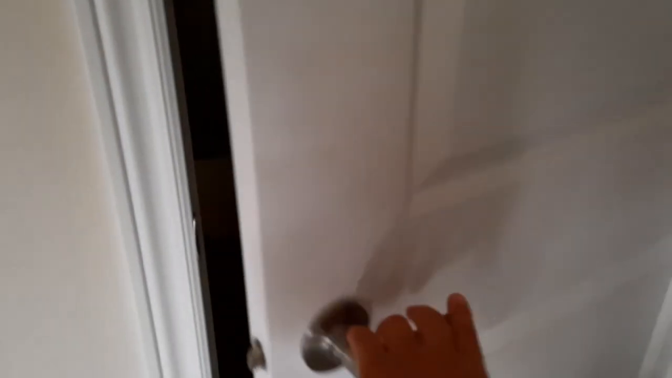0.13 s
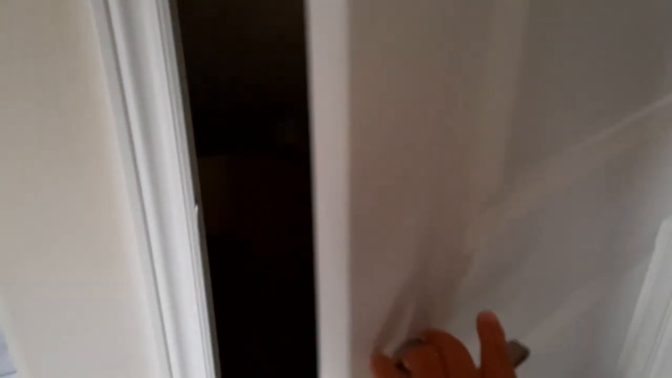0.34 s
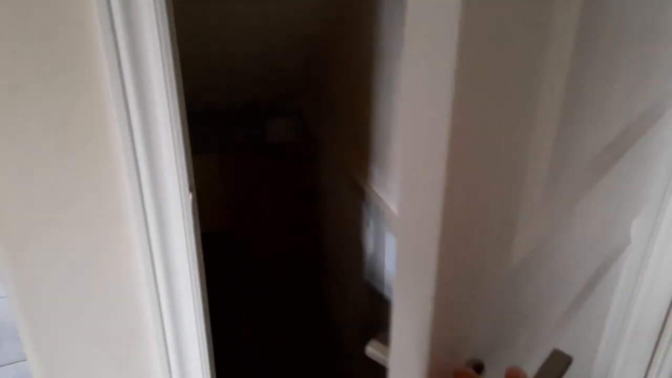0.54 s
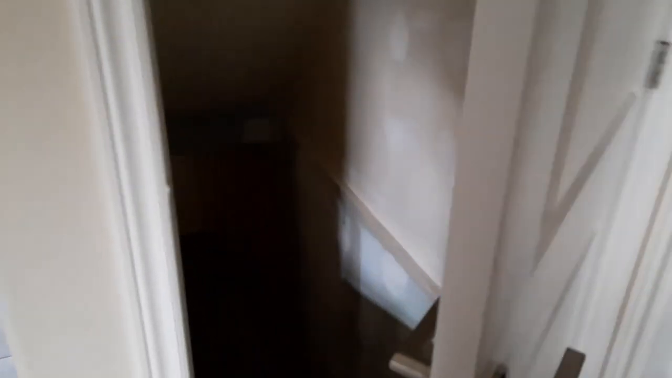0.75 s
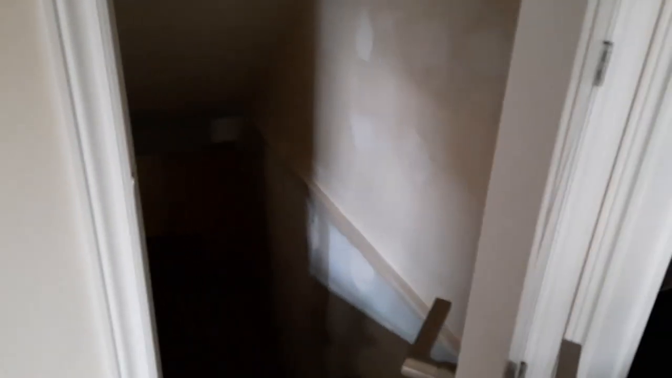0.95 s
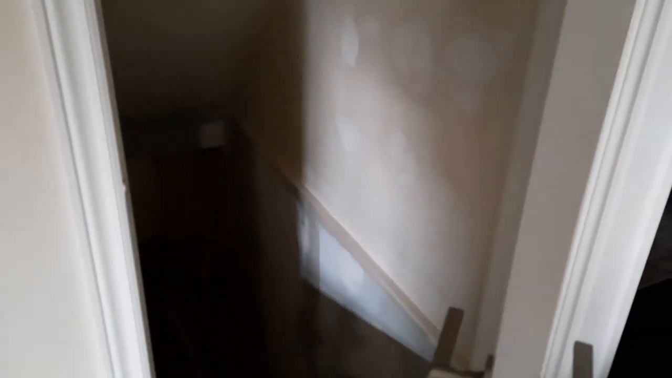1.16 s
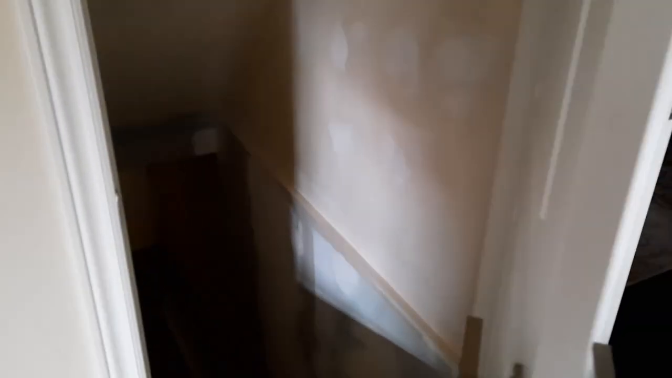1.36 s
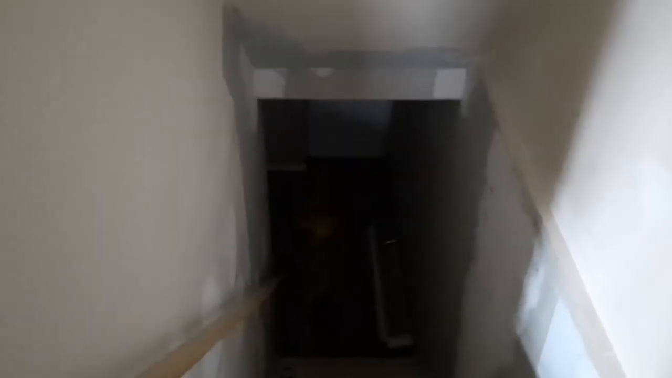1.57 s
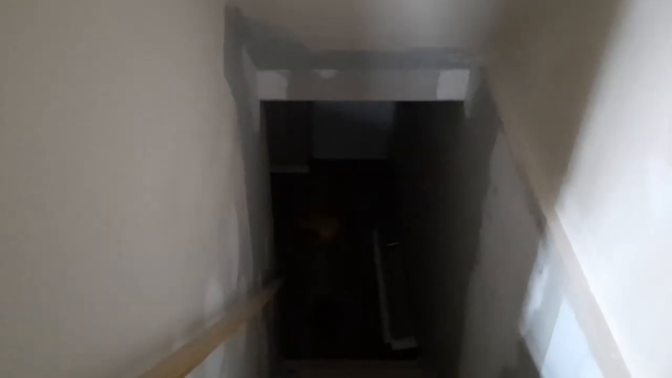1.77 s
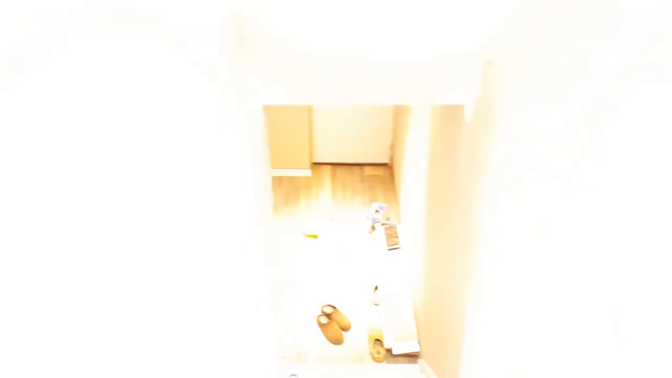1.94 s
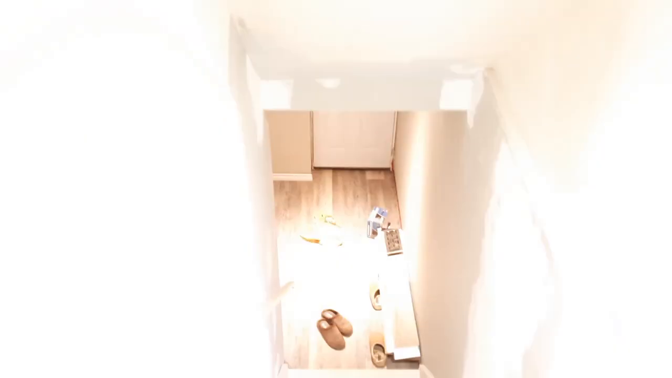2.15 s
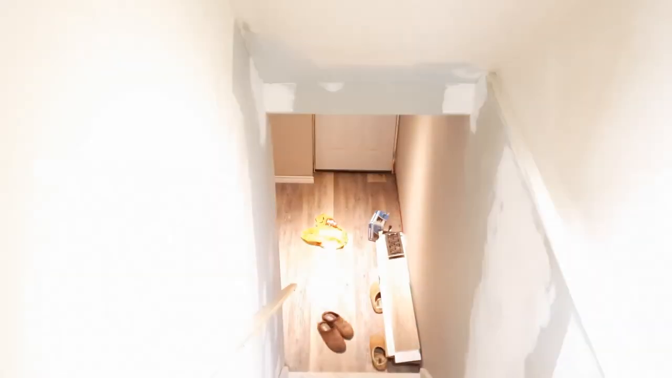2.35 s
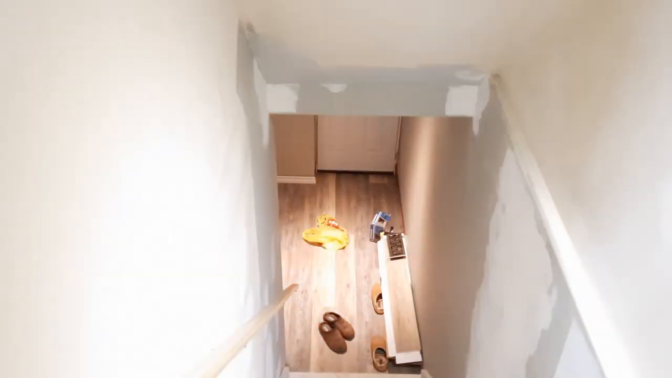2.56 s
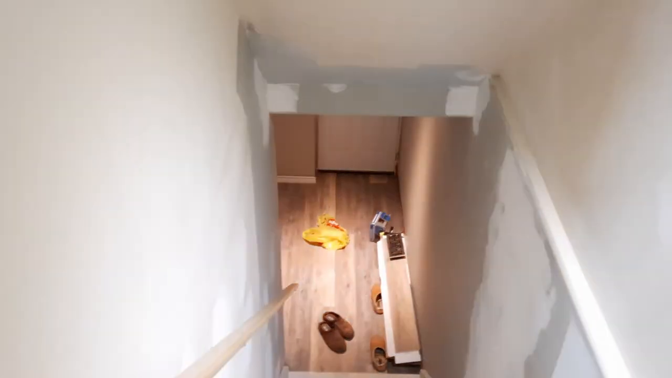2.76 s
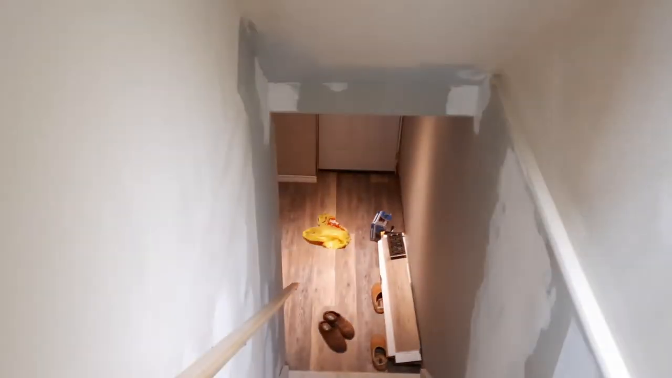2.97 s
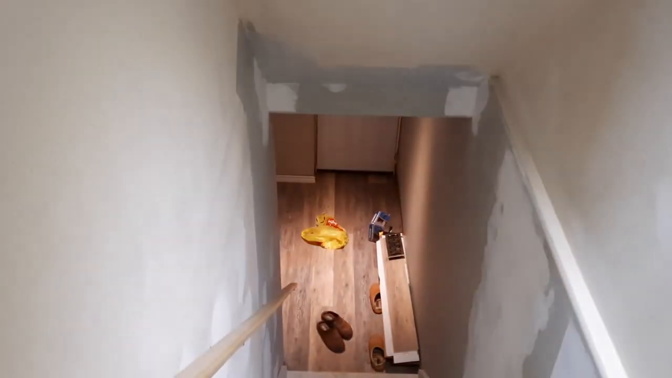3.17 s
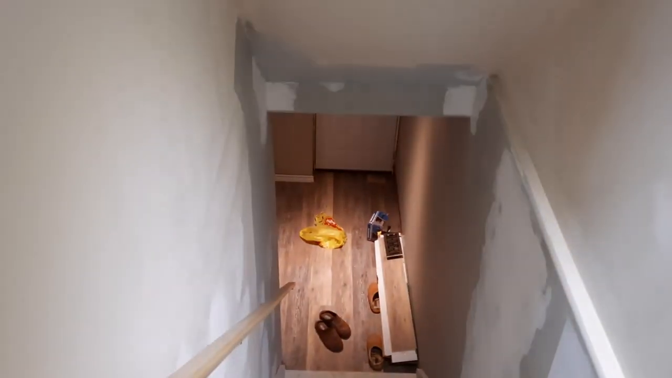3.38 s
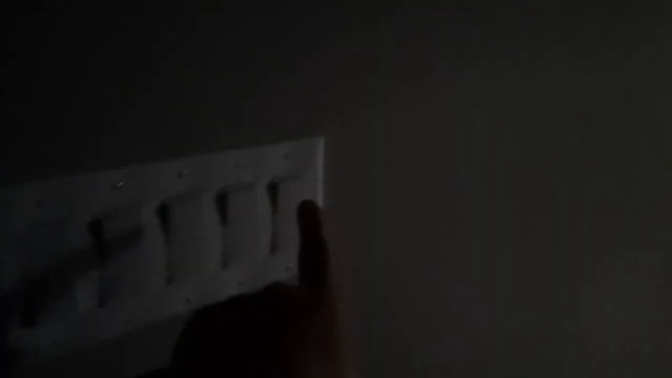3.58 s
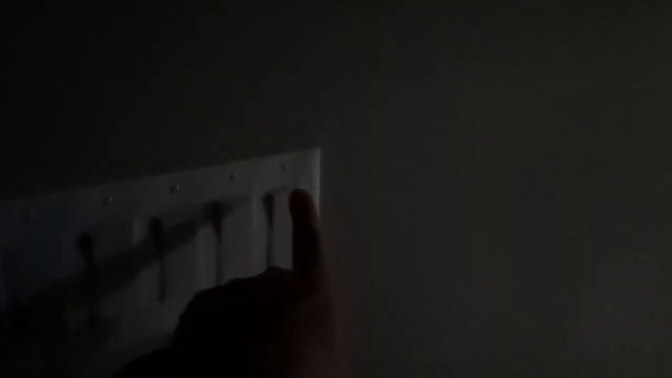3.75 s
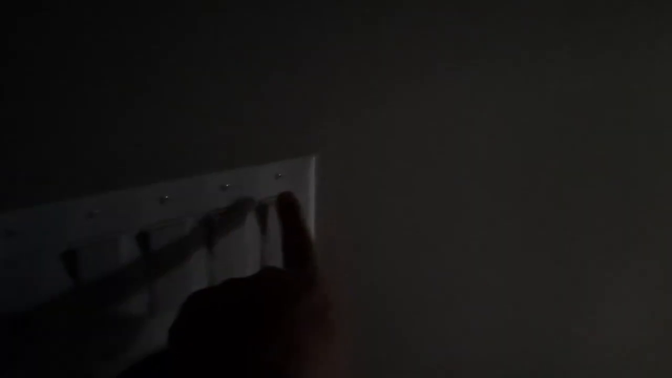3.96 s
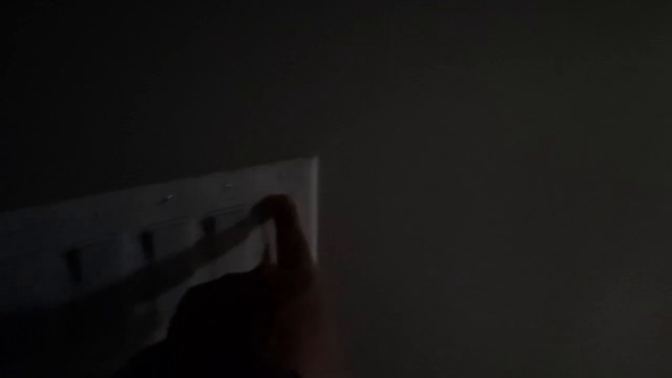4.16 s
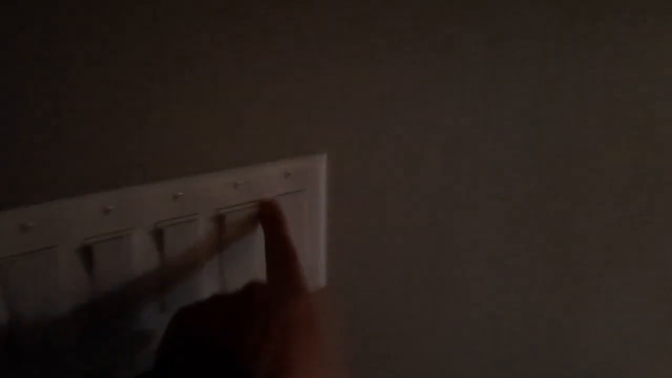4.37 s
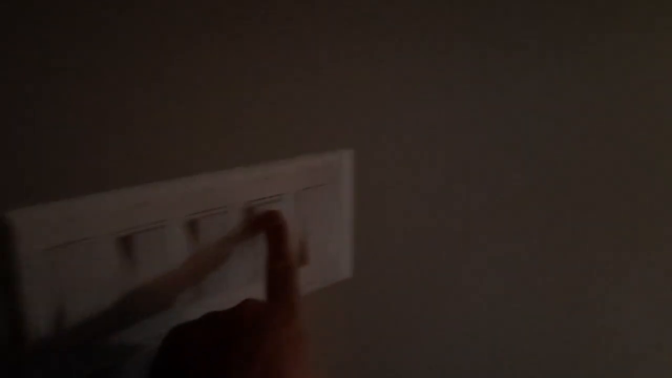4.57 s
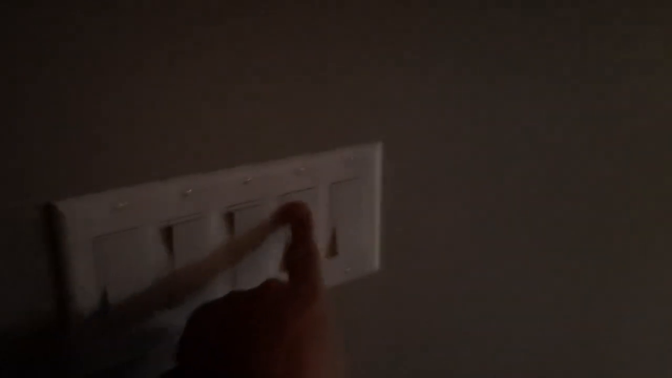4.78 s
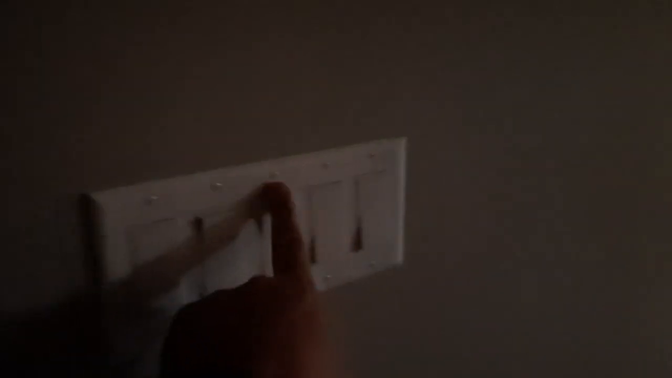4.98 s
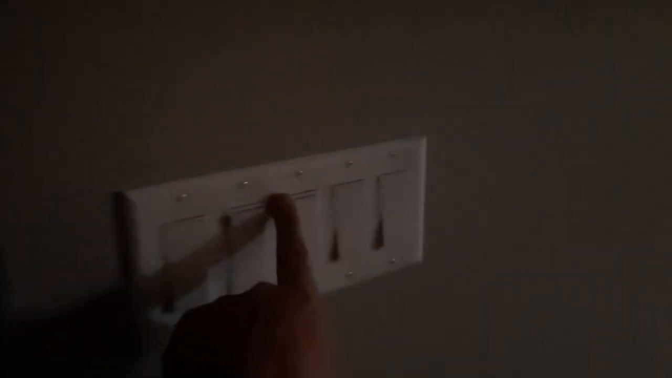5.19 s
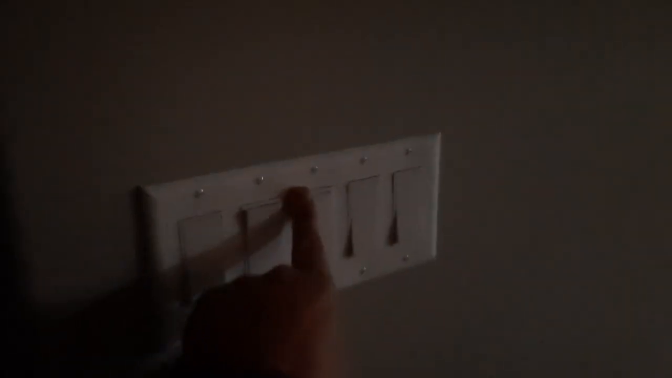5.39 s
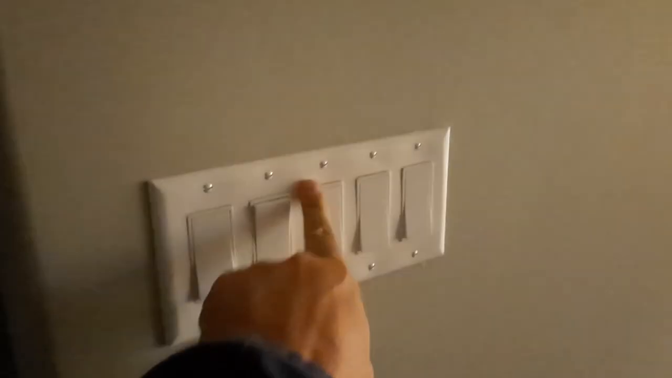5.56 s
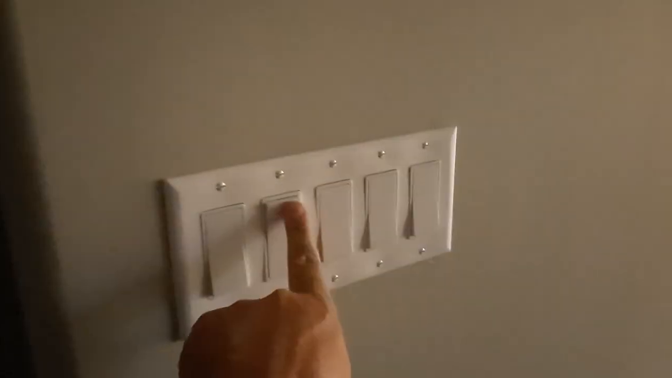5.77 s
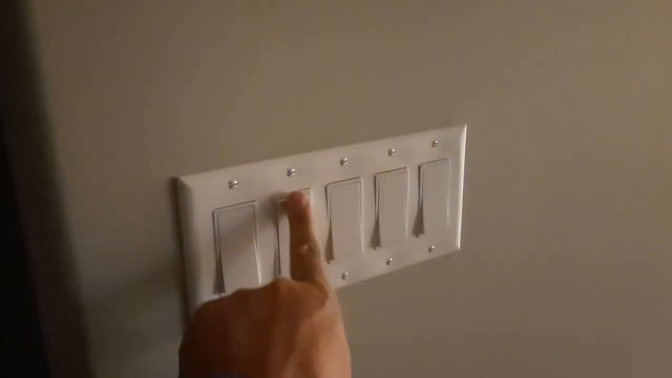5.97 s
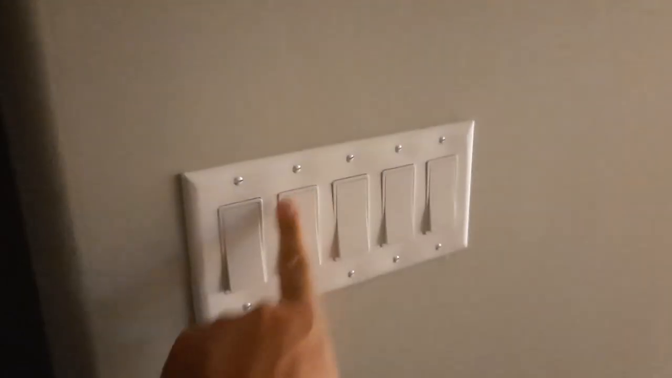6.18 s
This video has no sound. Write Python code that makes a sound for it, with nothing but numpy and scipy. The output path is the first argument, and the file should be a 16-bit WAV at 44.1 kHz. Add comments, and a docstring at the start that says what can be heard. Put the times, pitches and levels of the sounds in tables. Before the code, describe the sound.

Faint rumble, hiss and electrical hum fill a quiet house. Right at the start a door knob gives a brief rising squeak, the metal latch snaps back and a hollow door shudders open, rattling until about 0.5 seconds, with a faint hinge sound at 0.7. The background drops out twice around 1.4 seconds. At 1.9 a rocker light switch clacks in the stairwell over a soft floor thud. Clothes rustle lightly near 2.9. After two more tiny dropouts around 3.6, the hum is gone and the place is a hallway. Four plastic switches snap close to the microphone at about 4.2, 4.7, 5.5 and 6.0 seconds, each preceded by a faint creak under the fingertip and ringing briefly in the plate and hollow wall. Soft rustles come between them, and a low thud at 5.0.

```python
"""In a quiet house, over rumble, mains hum and microphone hiss, a knob squeaks, the latch snaps back and
a hollow door shudders open onto a stairwell. Clothes rustle, the sound drops out twice, and a rocker
switch clacks over a soft thud in the floor. After two more dropouts we are in a hallway, without the hum:
four rockers of a wall plate are pressed close to the microphones, each creaking under the fingertip,
then snapping over and bouncing so that plate and hollow wall ring, with rustles and thuds in between."""
import sys
import numpy as np
from scipy import signal
from scipy.fft import rfft, irfft
from scipy.io import wavfile
from scipy.ndimage import uniform_filter1d

SR = 44100
rng = np.random.default_rng(int(sys.argv[2]) if len(sys.argv) > 2 else 0)


def pcm_store(signal):
    """Save signal as 16-bit PCM."""
    levels = np.round(np.clip(np.atleast_2d(signal), -1, 1) * 32767)
    wavfile.write(sys.argv[1], SR, levels.astype(np.int16).T)


N = 274743
T = np.arange(N) / SR
MOVE_S = 3.64  # cut from the stairwell to the hallway

# Resonances of the latch metal. Each row: pitch in Hz, width in Hz, level in dB.
LATCH_MODES = [(1500, 1200, 4), (2480, 700, 2), (3160, 1000, 0), (6300, 1200, -1.5), (8300, 1600, -2.5),
               (12700, 1700, -4)]
# Resonances of the hollow door leaf. Each row: pitch in Hz, width in Hz, level in dB.
DOOR_MODES = [(290, 23, -5), (393, 34, 0), (546, 110, -13.5), (653, 360, 6), (944, 110, -1.5),
              (1220, 230, -6), (1720, 500, -11.5)]


def undb(db):
    return 10 ** (np.asarray(db, float) / 20)


def unit(x):
    """Scale to an rms of 1."""
    return x / np.sqrt(np.mean(x ** 2))


def pan(db):
    """Stereo gains with the left db above the right."""
    return undb([[db / 2], [-db / 2]])


def add(out, x, s):
    """Mix a stereo piece in at time s."""
    i = int(s * SR)
    out[:, i:i + x.shape[1]] += x[:, :N - i]


def on_log(hz, table):
    """Read a (Hz, value) table on a log axis."""
    freqs, values = np.transpose(table)
    return np.interp(np.log(np.maximum(hz, 1)), np.log(freqs), values)


def curve(rows, column=1):
    """A dB column as gain over time, silent outside its span."""
    rows = np.array(rows, float)
    return undb(np.interp(T, rows[:, 0], rows[:, column], left=-200, right=-200))


def swell(s, rise_s, hold_s, fade_db_s):
    """Gain that climbs 20 dB per rise_s up to time s, holds, then fades at a steady rate."""
    rise_db = np.minimum(20 * (T - s) / rise_s, 0)
    fade_db = fade_db_s * np.maximum(T - s - hold_s, 0)
    return undb(np.maximum(rise_db - fade_db, -200))


def after(hits, column, t60):
    """Gain over time: each hit adds power that dies away in t60 seconds."""
    power = np.zeros(N)
    hits = np.array(hits)
    power[(hits[:, 0] * SR).astype(int)] = undb(2 * hits[:, column])
    return np.sqrt(signal.lfilter([1], [1, -undb(-120 / (t60 * SR))], power))


def wander(hz):
    """Smooth random drift with an rms of 1."""
    span = int(SR / hz)
    drift = uniform_filter1d(rng.standard_normal(N), span, mode="wrap")
    return unit(uniform_filter1d(drift, span, mode="wrap"))


def ring(x, modes):
    """Excite (Hz, width Hz, dB) resonances of alternate sign; at 0 dB an impulse rings each equally."""
    return sum((-1) ** k * undb(db) * SR / (2 * np.pi * width)
               * signal.lfilter(*signal.iirpeak(hz, hz / width, SR), x)
               for k, (hz, width, db) in enumerate(modes))


def ringing_noise(modes, shape=(2, N)):
    """Steady noise coloured by resonances, with an rms of 1."""
    return unit(ring(rng.standard_normal(shape), modes))


def chatter(size, ms):
    """One contact as each microphone gets it: a quick scatter of micro-impacts of unit energy."""
    x = rng.standard_normal((2, size)) * np.exp(-np.arange(size) / (ms * SR / 1000))
    return x / np.sqrt(np.sum(x ** 2, axis=1, keepdims=True))


def diffuse(size, alike=1.0):
    """Spectra of a noise pair, narrow in the low mids and wide in the treble."""
    # Stereo likeness. Each row: frequency in Hz, left-right correlation.
    likeness = [(60, 0.31), (300, 1), (650, .35), (1400, .08), (16000, 0.16)]
    hz = np.fft.rfftfreq(size, 1 / SR)
    like = np.clip(alike * on_log(hz, likeness), 0, 1)
    mid, side = rfft(rng.standard_normal((2, size)))
    return hz, np.sqrt(1 + like) * mid + np.array([[1], [-1]]) * np.sqrt(1 - like) * side


def room(t60, hold_ms=5, rise_ms=6):
    """Stereo reverb of unit energy: half-octave bands of noise build up, hold and die away."""
    # Decay by band. Each row: frequency in Hz, multiple of the room's t60.
    decay_share = [(100, 1.5), (300, 1.1), (1000, 1.25), (4000, 1.328), (12000, 0.91)]
    t = np.arange(int(.6 * SR)) / SR
    fading_s = np.maximum(t - hold_ms / 1000, 0)
    hz, pair = diffuse(len(t))
    tail = 0
    for centre in 45 * 2 ** np.arange(0, 9, .5):
        window = np.clip(1 - np.abs(2 * np.log2(np.maximum(hz, 1) / centre)), 0, 1)
        decay = undb(-60 * fading_s / (t60 * on_log(centre, decay_share)))
        tail = tail + irfft(pair * window, len(t)) * decay
    build_up = 1 - np.exp(-(t * 1000 / rise_ms) ** 2)
    return unit(tail * build_up) / np.sqrt(len(t))


def background():
    """House rumble and microphone hiss; the wavering mains hum is heard only by the stairs."""
    # Room tone of stairwell and hallway. Each row: frequency in Hz, relative level in dB.
    stairs = [(18, -42), (30, -16), (93, -10), (145, -20), (179, -6.5), (210, -16), (540, -24), (3490, -39),
              (11100, -36), (16000, -40)]
    hall = [(18, -57.5), (30, -15), (93, -5), (194, -10), (259, -12), (415, -15), (486, -20), (616, -25),
            (1860, -30), (2010, -34.5), (6900, -42), (16000, -37.5)]

    def room_tone(spectrum, db):
        hz, pair = diffuse(N, alike=0.67)
        return undb(db) * unit(irfft(pair * undb(on_log(hz, spectrum)), N))
    stairs_tone, hall_tone = room_tone(stairs, db=-63), room_tone(hall, db=-61)
    hum_hz, hum_db = 180.8, -63
    hum = undb(hum_db + .8 * wander(8)) * np.sin(2 * np.pi * hum_hz * T + .2 * wander(4))
    return np.where(T < MOVE_S, stairs_tone + hum, hall_tone)


def clothes():
    """Cloth rubs in short swells, a fine hiss over a coarser scuff."""
    # Each row: time of full level in seconds, rise and hold in seconds, fade in dB per second,
    # fine hiss in dB, coarse rub in dB, left minus right in dB.
    rustles = [(1.269, .008, 0.0059, 162, -62.5, -63, -0.5), (1.5, 0.046, .03, 73.5, -67, -66.5, 0.5),
               (2.873, 0.003, 0.021, 452, -51, -51.5, -12.5),
               (2.963, 0.078, 0.031, 127, -68.5, -60.5, -13.5), (3.092, 0.019, 0.029, 400, -63.5, -76, -11),
               (3.45, 0.031, .01, 114, -66, -67.5, -8.5), (3.689, .08, 0.013, 92, -71.5, -82, 5),
               (4.4, 0.036, .01, 109, -66, -62, -7), (5.2, .13, 0.0076, 347, -66, -72.5, -5),
               (5.605, 0.028, 0.011, 220, -59, -68, -0.5)]
    fine = ringing_noise([(12400, 4600, 26), (6270, 1000, 4.5)])
    coarse = ringing_noise([(1720, 780, -2.5), (437, 300, -10), (3500, 3000, -2.0)])
    out = np.zeros((2, N))
    for s, rise_s, hold_s, fade_db_s, fine_db, coarse_db, lr_db in rustles:
        cloth = undb(fine_db) * fine + undb(coarse_db) * coarse
        out += cloth * swell(s, rise_s, hold_s, fade_db_s) * pan(lr_db)
    return out


def floor_thuds():
    """Soft blows ring two low resonances of the floor and spread into the room."""
    # Each row: start in seconds, level in dB, pitch in Hz.
    thuds = [(1.916, -25, 41), (2.871, -42.5, 110), (4.506, -50, 93.6), (4.965, -35.5, 123),
             (4.979, -27, 94), (5.015, -52, 165), (5.041, -60, 111)]
    out = np.zeros((2, N))
    reverb = room(t60=0.28)
    push = np.pad(np.hanning(int(0.0018 * SR)), (0, 8192))
    for s, db, hz in thuds:
        thud = ring(push / push.sum(), [(hz, 35, 0), (3.1 * hz, 70, -6)])
        tail = signal.fftconvolve(reverb, thud[None])[:, :len(thud)]
        add(out, undb(db) * (thud + undb(1) * tail), s)
    return out


def fingertip():
    """A fingertip loads each hallway rocker with a faint, grainy creak before it flips."""
    # Each row: start in seconds, end in seconds, level in dB.
    presses = [(4.139, 4.18, -64), (4.695, 4.73, -70.5), (5.409, 5.451, -66.5), (5.995, 5.996, -73.5)]
    out = np.zeros((2, N))
    for start, end, db in presses:
        grains = rng.standard_normal((2, int((end - start) * SR))) ** 3
        creak = ring(grains, [(2270, 700, 6.5), (4200, 1400, -8)])
        add(out, undb(db) * unit(creak), start)
    return out


def knob_squeak():
    """The spindle turns with a rough, rising squeak and a scrape that rings latch and leaf."""
    # The squeak's path. Each row: time in seconds, pitch in Hz, relative level in dB.
    glide = [(0, 1680, -49.5), (.015, 1720, -45.5), (.045, 1744, -45), (.054, 1810, -48),
             (.062, 1794, -52.5), (.085, 1820, -62.5)]
    # Its harmonics. Each row: multiple of the pitch, level in dB.
    harmonics = [(1, -1), (2, -3), (3, -9), (4, -1.5), (5, -8.5), (6, -14.5), (7, -19)]
    s, hz = np.transpose(glide)[:2]
    pitch = np.interp(T, s, hz) * (1 + 0.0067 * wander(700))
    phase = 2 * np.pi * np.cumsum(pitch) / SR + np.array([[0], [.6]])  # the right channel leads
    squeak = sum(undb(db + 3.5 * wander(120)) * np.sin(k * phase) for k, db in harmonics)
    scrape = ringing_noise(LATCH_MODES + DOOR_MODES)
    return (squeak + undb(-3) * scrape) * curve(glide, column=2)


def door():
    """The knob turns, latch hits shake the leaf and loose metal, and the door swings on its hinge."""
    # Latch and knob hits. Each row: start in seconds, then in dB: spring and plate, bolt,
    # blow into the leaf, left minus right.
    hits = [(.083, -30, -47.5, -38, -9.5), (.097, -33, -49, -31, -1.5), (.116, -31, -46.5, -28, -3.5),
            (.135, -32.5, -52.5, -26.5, -3), (.151, -46, -36.5, -20.5, -1.5),
            (.156, -12.5, -26.5, -32, 1.5), (0.181, -18.5, -26.5, -24, 0.5), (.189, -11, -5, -24.5, -4.5),
            (.2, -22, -18, -20, -6), (0.227, -21.5, -18, -25.5, -0.5), (.236, -32, -10.5, -14, 2.5),
            (.243, -37, -28, -17, -8.5), (.252, -41, -23, -14.5, 2), (.262, -31, -25.5, -14.5, -1),
            (0.319, -29.5, -30.5, -33, 6.5), (.324, -44, -16.5, -17, -3.5), (0.381, -37, -22, -25.5, 1),
            (0.427, -48, -51, -48, -4), (0.478, -50.5, -57.5, -55.5, -9)]
    # Resonances of bolt, swinging leaf and hinge. Each row: pitch in Hz, width in Hz, level in dB.
    bolt_modes = [(830, 580, 4), (1205, 28, -10.5), (1431, 1200, 7)]
    swing_modes = [(87, 45, -4), (45, 96, -13), (164.9, 60, -5.5)]
    hinge_modes = [(899, 120, 9), (1877, 46, -2.5), (2024, 92, 3.5)]
    # Low swing of the leaf as it comes free. Each row: time in seconds, level in dB.
    swing_levels = [(.07, -47.5), (.18, -43.5), (.235, -28), (.26, -29), (.37, -52), (.4, -43),
                    (.43, -53.5), (.5, -63.5)]
    knob = knob_squeak()
    shudder = undb(-13.5) * ringing_noise(DOOR_MODES, N) * after(hits, column=3, t60=.12)
    grains = rng.standard_normal((2, N)) ** 3
    rattle = undb(-4.5) * unit(ring(grains, LATCH_MODES)) * after(hits, column=1, t60=.1)
    swing = ringing_noise(swing_modes, N) * curve(swing_levels)
    hinge = undb(-59.5) * ringing_noise(hinge_modes) * swell(0.685, rise_s=.05, hold_s=0, fade_db_s=88.5)
    out = .4 * knob + shudder + rattle + swing + hinge
    push = np.pad(np.hanning(16) / 8, (0, 8192 - 16))  # softer than the touch on spring and plate
    bolt, leaf = ring(push, bolt_modes), ring(push, DOOR_MODES)
    for s, spring_db, bolt_db, leaf_db, lr_db in hits:
        spring = ring(chatter(len(push), ms=1), LATCH_MODES)
        hit = undb(spring_db) * spring + undb(bolt_db) * bolt + undb(leaf_db) * leaf
        add(out, hit * pan(lr_db), s)
    send = out[:, :SR].mean(axis=0)
    add(out, undb(-3) * signal.fftconvolve(room(t60=0.3), send[None]), 0)
    return out + 3.03 * knob  # the knob is so close that it stays mostly dry


def rockers():
    """Each rocker snaps over and bounces; plate and hollow wall answer, and the room carries the tail."""
    # Each row: start in seconds, level in dB, left minus right in dB, rocker pitch and width in Hz,
    # plate and frame pitch in Hz, bounce delay in ms, then in dB: bounce, wall, plate, contacts, tick.
    switches = [(1.858, -17, 1, 2200, 500, 631, 907, 2.37, -1.5, -21.5, -14, -10, 2.5),
                (4.187, -14.5, -0.5, 2650, 600, 774.5, 1554, 8.5, -10.5, -15.5, -5.5, -7, -4),
                (4.747, -11.5, -1, 2177, 380, 1074, 2700, 7.9, -8.5, -14.5, -11, -1.5, -1),
                (5.454, -14, -1, 1917, 221, 960, 1330, 2.2, -3.5, -16.5, -8, -10, -7),
                (6.023, -9.5, -0.5, 2480, 700, 1096, 3140, 6.4, -5, -22, -14, -2.5, -4)]
    # Resonances of wall, contacts and bright tick. Each row: pitch in Hz, width in Hz, level in dB.
    wall_modes = [(107, 65, -8.5), (312, 60, 9.5)]
    contact_modes = [(3500, 1400, -7.5), (4487, 790, -3.5), (6480, 820, -0.5), (7650, 230, -13.5)]
    tick_modes = [(12400, 3100, 1)]
    # Resonances of the plate. Each row: multiple of its pitch, width in Hz, level in dB.
    plate_modes = [(0.659, 200, -9.5), (1, 150, 3)]
    stairwell, hallway = (19.9, 0.3, 73), (8.36, 0.36, 5.1)  # reverb level in dB, t60 in s, hold in ms
    out, blow = np.zeros((2, N)), signal.unit_impulse(4096)
    for (s, db, lr_db, rocker_hz, width_hz, plate_hz, frame_hz, bounce_ms,
         bounce_db, wall_db, plate_db, contacts_db, tick_db) in switches:
        room_db, t60, hold_ms = stairwell if s < MOVE_S else hallway
        plate = [(k * plate_hz, width, level) for k, width, level in plate_modes]
        frame = [(frame_hz, 0.22 * frame_hz, 2.5)]

        def plastic(x):
            return undb(plate_db) * ring(x, plate + frame) - ring(x, [(rocker_hz, width_hz, 0)])

        def metal(x):
            return undb(contacts_db) * ring(x, contact_modes) + undb(tick_db) * ring(x, tick_modes)

        def bounce(first, second):
            return first + undb(bounce_db) * np.roll(second, int(bounce_ms * SR / 1000), axis=-1)
        scatter = bounce(chatter(len(blow), ms=1.6), chatter(len(blow), ms=2.2))
        loose = chatter(len(blow), ms=12)  # loose parts rattle on a little longer
        wall = undb(wall_db) * ring(blow, wall_modes)
        clack = plastic(0.79 * bounce(blow, blow) + 3.83 * loose)
        click = metal(4.3 * scatter + 0.77 * loose)
        near = clack + click + 0.39 * wall  # the broad wall is heard mostly by way of the room
        # the plastic radiates in its own directions, so it takes its own paths through the room
        sends = wall + metal(blow), plastic(blow)
        tail = undb(room_db) * sum(signal.fftconvolve(room(t60, hold_ms), x[None]) for x in sends)
        add(out, undb(db) * tail * pan(1.4 * lr_db), s)
        add(out, undb(db) * near * pan(lr_db), s)
    return out


def scene():
    return door() + rockers() + fingertip() + floor_thuds() + clothes() + background()


def record(dry):
    """The loudest peaks are rounded and the sound drops out briefly; the top is shelved down, then cut."""
    # Each row: start in seconds, end in seconds, gain at the middle of the gap in dB.
    dropouts = [(1.35, 1.413, -35), (1.456, 1.489, -22), (3.506, 3.54, -33), (3.612, 3.668, -38)]
    edge_lift_db, shelf_hz, cut_hz = 6, 15650, 16900
    gain = np.ones(N)
    for start, end, db in dropouts:
        gap = (T > start) & (T < end)
        arch = np.sin(np.pi * (T[gap] - start) / (end - start))
        gain[gap] = undb(db + edge_lift_db * (1 - arch))
    gapped = np.tanh(dry) * uniform_filter1d(gain, size=44)
    shelved = signal.sosfilt(signal.ellip(6, .2, 25, shelf_hz, fs=SR, output="sos"), gapped)
    return signal.sosfilt(signal.ellip(10, .2, 70, cut_hz, fs=SR, output="sos"), shelved)


dry = scene()
out = record(dry)
pcm_store(out)
```